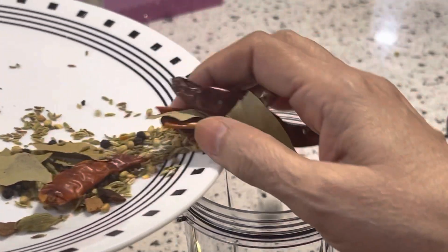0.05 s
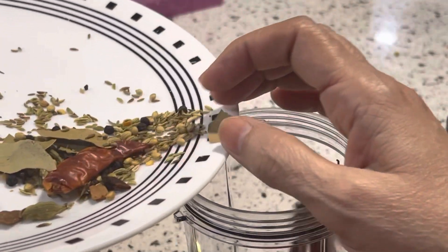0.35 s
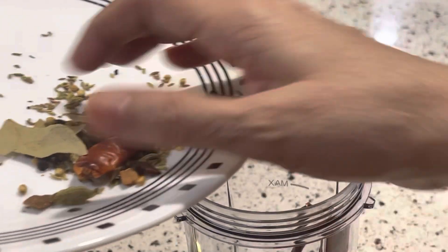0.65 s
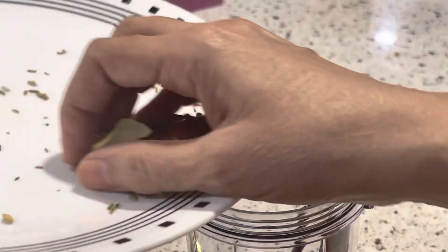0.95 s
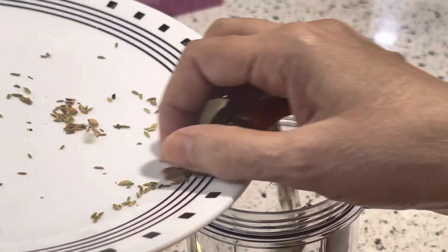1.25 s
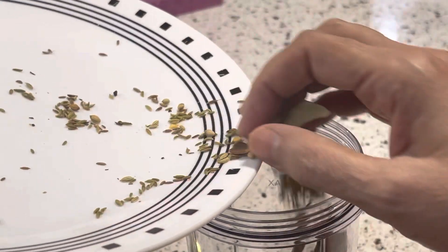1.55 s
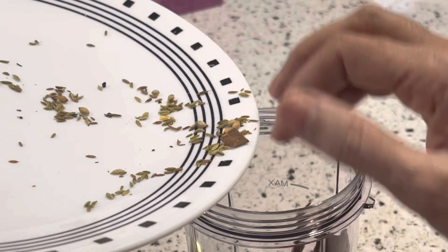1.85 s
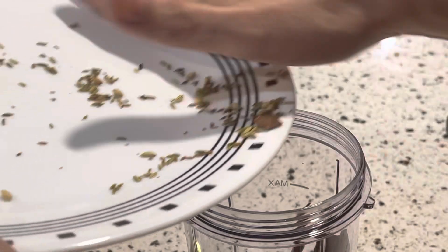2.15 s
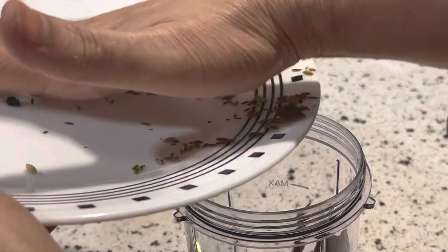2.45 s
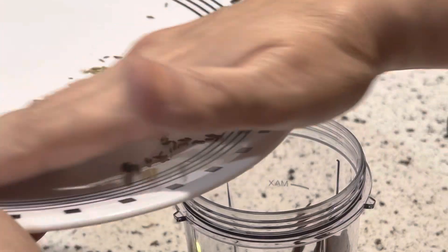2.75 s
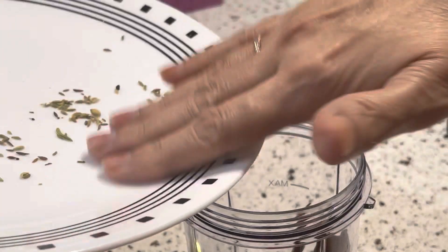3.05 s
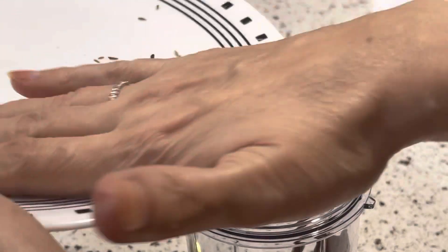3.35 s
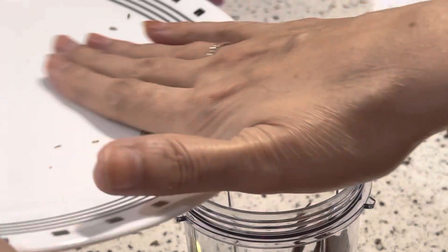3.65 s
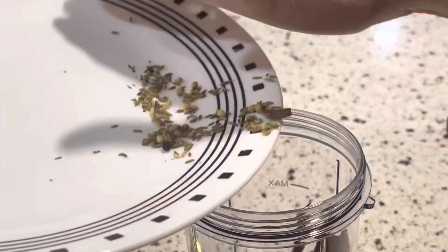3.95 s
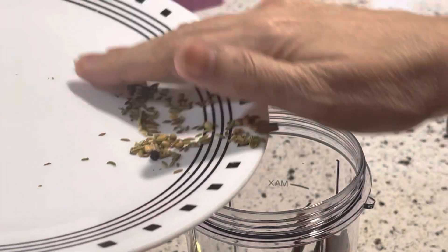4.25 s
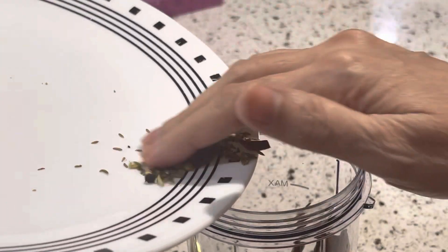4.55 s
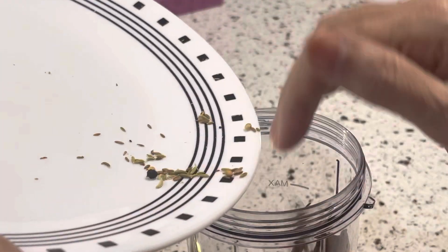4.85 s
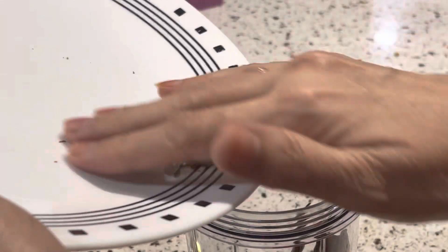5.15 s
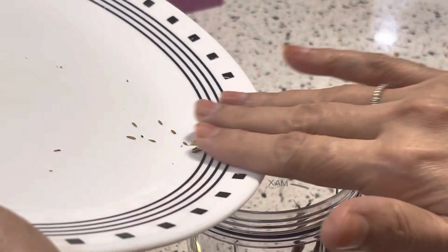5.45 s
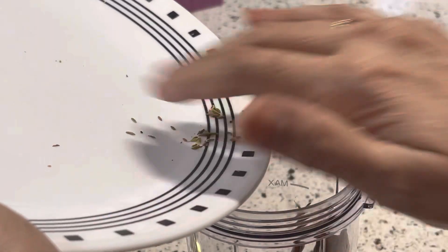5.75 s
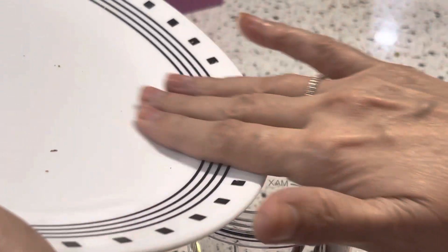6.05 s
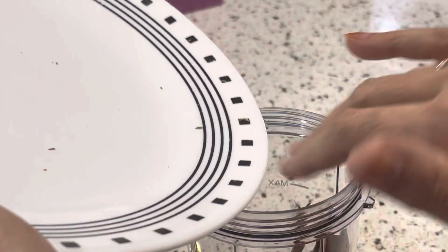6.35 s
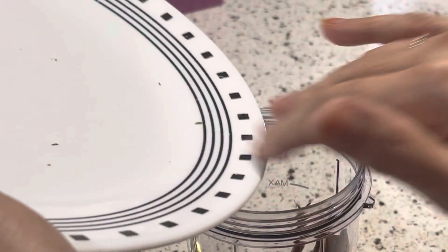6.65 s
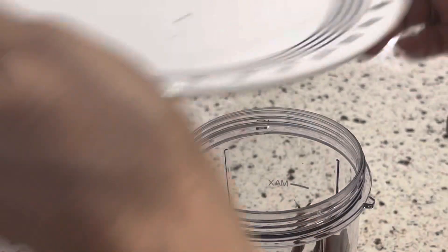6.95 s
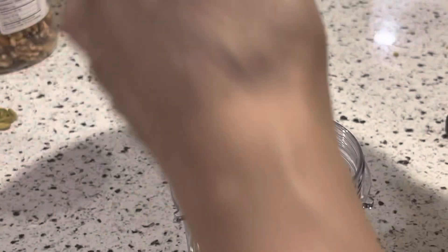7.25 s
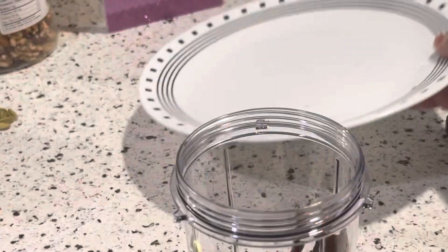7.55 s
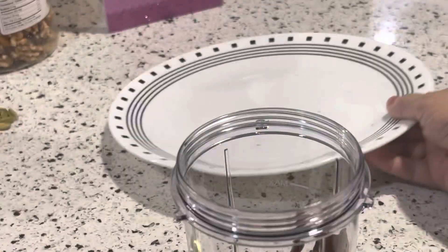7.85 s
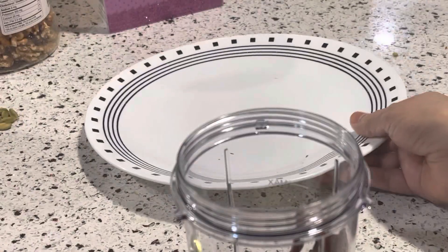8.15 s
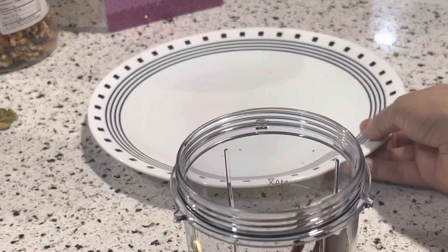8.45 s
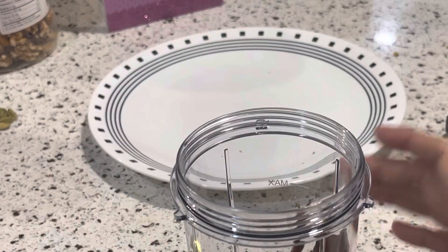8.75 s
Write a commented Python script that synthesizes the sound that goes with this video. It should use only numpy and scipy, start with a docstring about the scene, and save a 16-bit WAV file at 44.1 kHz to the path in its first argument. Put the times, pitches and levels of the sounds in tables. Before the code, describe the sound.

Seeds rattle into a plastic jar as a hand rubs a ringing ceramic plate, which then clunks onto a stone counter.

```python
"""In a kitchen, close by, dry whole spices are pinched and swept off a ceramic plate into a plastic jar. The
seeds patter as many small impacts and excite the resonances of the hollow jar. Friction of a palm on the glaze
makes a hiss and sets the plate singing; knocks of the plate on the jar's rim ring the plate's damped modes. At
the end clothing brushes, the empty plate is set on the stone counter, and the room reverberates."""
import sys
import numpy as np
from scipy import signal
from scipy.fft import rfft, irfft, next_fast_len
from scipy.io import wavfile
from scipy.ndimage import map_coordinates

SR = 44100
rng = np.random.default_rng(int(sys.argv[2]) if len(sys.argv) > 2 else 0)


def wrap_up_sound(samples):
    """Save the sound to the file named by the first command line argument, as 16-bit audio."""
    columns = np.atleast_2d(samples).T
    # keep every value between -1 and 1, then stretch to whole-number steps
    tamed = np.clip(columns, -1, 1)
    steps = np.round(tamed * 32767).astype(np.int16)
    wavfile.write(sys.argv[1], SR, steps)


N = 396459

# Levels in the tables are relative: each source applies its own gains and filters.
# handfuls sliding off the plate: (start [s], length [s], level [dB], dull share [dB], ping share [dB])
HANDFULS = [(0.0, .07, -47.5, 8, -7), (0.06, .22, -48, 7, -6), (0.24, .28, -44, 6, -4),
            (0.8, .36, -46.5, 4, -6), (1.02, .36, -52, 4, -7), (1.27, .64, -37.5, 4.5, -3),
            (1.78, .28, -56, -1, -4), (4.795, .27, -40, -4, -8), (5.625, .12, -48, 4, -10),
            (5.74, .2, -62, -5, -8), (6.388, .13, -51.5, -8, -10)]
# large pods, leaves and seeds that snap or land: (time [s], level [dB], dull share [dB])
PIECES = [(0.0744, -28, -4), (0.1171, -29, -18), (0.1353, -16, -11.5), (0.1834, -28, -1), (0.19, -27, -6.5),
          (0.2339, -11.5, -17.5), (0.242, -18, -18.5), (0.2488, -15, -22), (0.2535, -12.5, -18),
          (0.2749, -17, -6), (0.2803, -14, -10), (0.285, -10.5, -5), (0.3011, -19, -9), (0.3524, -15, -7),
          (0.3562, -13, -5), (0.3648, -18, -10), (0.3738, -16, -4), (0.3775, -9, -7), (0.3854, -14.5, -9),
          (0.796, -35, -8), (0.8022, -31, -3), (0.8145, -24, -5), (0.8185, -21, -7), (0.8857, -25, -9),
          (0.9235, -24, -6), (0.9679, -24, -11), (0.9936, -22.5, -17), (1.032, -20, -9.5),
          (1.1984, -31, -13.5), (1.2713, -32, -18), (1.296, -35, 2), (1.3102, -31, 0), (1.3409, -17.5, -12),
          (1.3611, -22, -9), (1.3819, -20, 2), (1.4144, -22, -14), (1.4344, -18, -12), (1.4639, -21, -10),
          (1.4803, -17, -9), (1.4915, -19, -14), (1.5048, -15, -16), (1.5547, -16, -17), (1.5615, -17, -13),
          (1.5714, -20, -14), (1.589, -20, -10), (1.6284, -24, -10), (1.6495, -24, -8), (1.6594, -22, -2),
          (1.6844, -25, -6), (1.7123, -20, -8), (1.7205, -21, -7), (1.7294, -25, -7), (1.7655, -22, -3),
          (1.768, -19, -6), (1.7931, -30, -16), (1.8285, -30, -10), (1.8464, -30, -13), (1.8901, -32, -6.5),
          (1.9074, -35, -13), (1.9669, -23.5, -24), (3.9244, -51, -15), (3.9609, -45, -26),
          (4.7314, -35, -24), (4.7378, -30, -22), (4.7463, -27, -26), (4.7627, -24, -0.5),
          (4.7967, -33, -10), (4.8334, -30, -6), (4.856, -26, -13), (4.8814, -26, -24), (4.8939, -20, -22),
          (4.9299, -24, -16), (5.0027, -28, -18), (5.429, -29.5, -5.5), (5.5313, -33.5, -8.5),
          (5.56, -34.5, -15), (5.638, -31, -18.5), (5.6534, -33, -3), (5.7279, -41, -5), (5.7725, -30, -25),
          (5.7936, -23.5, -28), (5.8014, -36, -10), (5.8825, -40, -14), (6.4113, -35, -18),
          (6.436, -35, -16), (6.755, -49, -20), (6.7785, -38, -30), (6.791, -43, -26), (6.803, -49, -24)]
# spectra of the bright and the dull part of the spices: (frequency [Hz], level [dB])
BRIGHT_SPECTRUM = [(40, -48), (260, -45), (700, -28), (1300, -25), (2200, -20), (4000, -10), (6500, -3.5),
                   (8300, -1), (9200, -4.5), (10400, -19), (11400, -11.5), (13500, -26), (15700, -28)]
DULL_SPECTRUM = [(60, -22), (300, -22.5), (700, -5.5), (1000, -17.5), (1300, 6), (1600, -1.5), (3000, 2),
                 (6000, -1.5), (9000, -6.5), (10500, -29), (16000, -46)]
# resonances of the glaze under sliding seeds: (frequency [Hz], bandwidth [Hz], level [dB])
SLIDING_MODES = [(4650, 300, -2), (8400, 450, 0)]
# clumps of seeds reaching the bottom of the jar: (time [s], level [dB])
LANDINGS = [(0.0, -54), (0.075, -57), (0.135, -50), (0.185, -53), (0.268, -43), (0.318, -47), (0.36, -39),
            (0.385, -38), (0.47, -53), (1.47, -54), (1.56, -45), (1.61, -48), (1.66, -50), (1.72, -48),
            (4.763, -49), (4.86, -58), (6.43, -64)]
# modes of the jar's air and walls: (frequency [Hz], t60 [s], level [dB])
JAR_MODES = [(172, .25, -21), (518, .18, 1), (1300, .07, -6)]
# moves of the arms and the held plate: (start [s], length [s], level [dB])
MOVES = [(0.0, .14, -57), (0.12, .36, -63), (0.48, .42, -75), (0.8, .07, -62), (1.09, .07, -59),
         (1.38, .2, -68), (1.58, .6, -76), (2.3, 1.02, -72), (3.41, .44, -70), (4.55, .7, -82),
         (5.42, .65, -65), (6.33, .37, -66), (6.98, .27, -77), (7.28, .3, -75), (7.5, .3, -73),
         (8.0, .5, -63), (8.48, .2, -61), (8.68, .31, -67)]
# spectra of the handling rustle and of the room's hush: (frequency [Hz], level [dB])
HANDLING_SPECTRUM = [(20, -28.5), (50, -4), (130, -3.5), (350, -2.5), (600, -14), (2000, -16), (3200, -25),
                     (9000, -32), (11000, -61)]
HUSH_SPECTRUM = [(20, -20), (60, 6), (250, -3), (700, -14), (1200, -17.5), (3500, -10.5), (6000, -9.5),
                 (8500, -3.5), (9400, -6.5), (10200, -35), (16000, -42)]
# blows on the plate: (time [s], level over the first 10 ms [dB], contact [name], high-pass [Hz],
# low-pass [Hz], ring length [ratio], crack rise [s])
BLOWS = [(0.8178, -30, "touch", 1000, 3600, .65, .0006), (2.1905, -18.3, "tap", 330, 12040, .9, .0012),
         (2.3692, -24, "clink", 600, 15060, .35, .0005), (2.3955, -31.5, "tap", 1800, 7000, .6, .0005),
         (2.410, -32, "tap", 2400, 11000, .55, .0004), (2.422, -37, "tap", 1800, 12000, .5, .0004),
         (2.449, -31, "clink", 1500, 6000, 1.1, .002), (2.4615, -18, "clink", 600, 8000, .8, .004),
         (2.471, -29, "clink", 400, 9000, .8, .001), (2.519, -31, "clink", 1000, 3500, 1.3, .002),
         (4.543, -42, "touch", 330, 1500, 1, .0006), (5.3255, -26.3, "pat", 180, 5600, 1, .0009),
         (6.0813, -34.3, "pat", 185, 4800, 1, .0009), (7.032, -55, "graze", 600, 11000, 1, .0006),
         (7.040, -59, "graze", 600, 14200, 1, .0006), (7.135, -64, "graze", 900, 5000, 1, .002),
         (7.717, -66, "touch", 550, 2600, 1.5, .002), (7.8538, -11, "set", 230, 10000, 1, .0015),
         (7.871, -31, "set", 900, 9000, .6, .001), (8.0808, -37, "graze", 4300, 14000, .45, .0004),
         (8.5206, -52.5, "graze", 1800, 12000, .5, .0004)]
# six contacts: edge tap on the jar, rim clink, pat of the hand, foot set on the counter, fingertip
# touch, light graze; name: (crack decay [s], crack level [dB], thud level [dB], room share [dB])
CONTACTS = {"tap": (.003, 2.5, -32, -11.5), "clink": (.003, 1, -31, -10), "pat": (.006, .5, -12.5, -8.5),
            "set": (.0025, -5.5, -26, -9.5), "touch": (.005, -5, -13, -11), "graze": (.004, -2, -30, -7)}
# modes of the plate on jar or counter: (frequency [Hz], t60 [s], level at each of the six contacts [dB])
PLATE_MODES = [(171, .28, -44.5, -48, -18.5, -16, -30, -40), (415, .08, -41, -42, -6, -19, -16, -35),
               (510, .12, -27, -36, -3.5, -30, -1, -35), (560, .052, -11, -41.5, -6, -30, -14, -35),
               (765, .075, -20.5, -8, -3, -.5, -16, -20), (773, .9, -27, -31, -33, -28, -34, -32),
               (783, .12, -7, -18, -2, -17, 0, -5), (960, .04, -36, -11, -15, -16, -16, -25),
               (1430, .09, -16, -12, -22, -20, -8, -9), (1570, .08, -19.5, -11, -34.5, -24, -25, -25),
               (1700, .054, -19.5, -12, -32, -13, -28, -20), (2105, .06, 2, -15.5, -9, -27.5, -28, -15),
               (2320, .08, -12.5, -1, -21, -14.5, -14, -18), (2780, .06, -3, -5, -17, -33, -32, -18),
               (2920, .05, -9, -3, -28, -45, -40, -25), (3230, .04, -8, -2, -37.5, -39.5, -40, -28),
               (3410, .06, -11, 0, -14, -29, -35, -12), (4085, .055, -5, -22, -17, -21, -35, -22),
               (4390, .1, -9, -5, -17, -16, -22, -3), (4530, .08, -7, -4, -26, -26, -24, -7),
               (4885, .06, -8, -19.5, -25, -39.5, -24, -9), (5590, .06, -9, 1, -17, -33, -14, -3),
               (5760, .06, -3, -9, -24, -32, -17, -3), (6350, .056, -16, -20, -24, -19.5, -24, -4),
               (6820, .06, -4, -14, -18, -33, -18, -4), (7050, .06, -2, -2, -19, -35, -16, 2),
               (7850, .05, -4, -15, -21, -22, -20, -5), (8380, .06, -5, 0, -17, -21, -13, -5)]
# the crack, from many brief modes: (frequency [Hz], level at each of the six contacts [dB])
CRACK_SPECTRA = [(40, -42, -38, -15.5, -25, -20, -30), (307, -25, -29, -8, -13, -8, -20),
                 (566, -16.5, -31, 5.5, -6.5, 3, -16), (960, -19, -9, -5, -10, 2, -16),
                 (1280, -4, -16, -5, -5, -1, -13), (2300, -3.5, -.5, -12, -4.5, -10, -11),
                 (2700, -.5, 1, -12, -15, -15, -12.5), (3050, 1.5, 2, -13, -28, -20, -14),
                 (3400, -3, -2, -12.5, -12, -20, -13.5), (3900, -8, -7, -12, -11, -20, -13),
                 (5000, -3, -12, -8, -22, -10, -4), (5800, 0, -7, -7, -16, -9, -2),
                 (8840, -4.5, 1, 2, -19.5, -6, -1), (9300, -10.5, -7, -9, -15.5, -12, 0),
                 (10600, -41.5, -27, -40, -38.5, -40, -22), (16500, -56.5, -61, -54.5, -69.5, -65, -45)]
# thud of a blow passing into the counter: (frequency [Hz], level [dB])
THUD_SPECTRUM = [(25, -30), (50, -5), (80, -7.5), (100, -10.5), (117, -4), (135, -8.5), (168, 5.5),
                 (205, -8.5), (270, -7.5), (320, -15.5), (420, -12), (900, -43), (3000, -81)]
# strokes of the hand over the glaze: (start [s], length [s], hiss level [dB], singing level [dB])
STROKES = [(1.24, .42, -52, -55), (2.58, .62, -58, -77), (3.43, .42, -55, -65), (3.995, .18, -60, -95),
           (4.13, .22, -61, -79), (4.3, .24, -59, -72), (4.54, .24, -58, -74), (5.06, .26, -62, -76),
           (5.44, .17, -60, -77), (5.89, .2, -59.5, -66), (6.11, .27, -55, -76), (6.6, .11, -56, -85),
           (7.02, .16, -74, -77), (7.78, .07, -68, -86), (8.25, .3, -66, -90), (8.5, .24, -65, -74),
           (8.74, .08, -69, -95), (8.85, .07, -60, -100), (8.93, .06, -68, -95)]
# spectrum of the friction hiss: (frequency [Hz], level [dB])
FRICTION_SPECTRUM = [(100, -41), (700, -26.5), (1500, -29.5), (3000, -21.5), (4500, -14), (7000, -6),
                     (8500, 2), (9400, -2.5), (10100, -26), (12000, -32), (16000, -45.5)]
# resonances of the plate under the hand: (frequency [Hz], bandwidth [Hz], level [dB])
SINGING_MODES = [(785, 35, 12), (1420, 55, 13), (2300, 74, 17), (3420, 80, 5), (4720, 110, 8),
                 (5560, 180, 2), (6150, 110, 4), (6850, 90, 1), (7100, 130, -1), (7700, 130, 0),
                 (8240, 60, -2), (8470, 160, -1)]
# brushes of clothing as the plate is carried away: (start [s], length [s], level [dB])
BRUSHES = [(7.28, .22, -68.5), (7.48, .22, -75), (7.72, .13, -74)]
# spectrum of brushing cloth: (frequency [Hz], level [dB])
CLOTH_SPECTRUM = [(100, -8), (500, 2), (1000, -1), (2300, -1), (3300, -9), (5000, -6), (7000, -5),
                  (8800, -2), (10200, -22), (12000, -18), (16000, -40)]
# reverberation of the kitchen: (frequency [Hz], t60 [s], level [dB])
ROOM_BANDS = [(100, .5, 0.5), (250, 0.22, 3.5), (770, 1.125, 0.5), (2050, 0.98, 1), (5000, 0.94, -0.5),
              (8500, .85, -1), (12000, 0.92, 0), (16000, 0.31, -14.5)]


def amp(db):
    """Amplitude ratio of a level in decibels."""
    return 10 ** (np.asarray(db) / 20)


def unit(x):
    """Normalisation to energy 1."""
    return x / np.sqrt(np.sum(x ** 2) + 1e-20)


def read(points, hz, column=1):
    """Linear interpolation of a table column over log frequency."""
    points = np.array(points)
    return np.interp(np.log(hz + 1), np.log(points[:, 0] + 1), points[:, column])


def add(mix, start_s, sound):
    """Superposition: a sound joins the mix at its start time."""
    part = mix[max(round(start_s * SR), 0):][:len(sound)]
    part += sound[:len(part)]


def colour(x, spectrum, column=1, size=4096):
    """Spectral shaping by a causal filter of energy 1."""
    log_gain = np.log(amp(read(spectrum, abs(np.fft.fftfreq(size, 1 / SR)), column)))
    taps = np.fft.ifft(np.exp(np.conj(signal.hilbert(log_gain)))).real[:size // 2]
    return signal.oaconvolve(x, unit(taps))[:len(x)]


def resonate(x, modes):
    """Forced response of resonators in parallel."""
    return sum(amp(db) * signal.lfilter(*signal.iirpeak(hz, hz / width, SR), x)
               for hz, width, db in modes)


def sweeps(rows, skew, sharpness, column=2):
    """Amplitude envelope: each movement is an arch that, with skew below 1, rises sooner than it falls."""
    gain = np.zeros(N)
    for row in rows:
        progress = np.linspace(0, 1, round(row[1] * SR))
        add(gain, row[0], amp(row[column]) * abs(np.sin(np.pi * progress ** skew)) ** sharpness)
    return gain


def wander(per_s):
    """Slow random modulation around zero."""
    return np.interp(np.arange(N) / SR * per_s, np.arange(2048), rng.standard_normal(2048))


def grains(per_s, spread_db, decay_s, shapes=24, size=192):
    """Shot noise: tiny impacts at random moments, a few of them large; rms 1."""
    onsets = np.flatnonzero(rng.random(N) < per_s / SR)
    strength = amp(spread_db * np.minimum(rng.exponential(1, N)[onsets], 4))
    shape = rng.integers(0, shapes, N)[onsets]
    ticks = rng.standard_normal((size, shapes)) * np.exp(-np.arange(size) / SR / decay_s)[:, None]
    out = np.zeros(N + size)
    for lag, values in enumerate(ticks / np.linalg.norm(ticks, axis=0)):
        out[onsets + lag] += strength * values[shape]
    return unit(out[:N]) * np.sqrt(N)


def seed_pings(per_s=550, spread_db=2.7, decay_cycles=4.5, range_hz=(2800, 9600)):
    """Damped oscillation: seeds of all sizes strike at random, each ringing at its own pitch; rms 1."""
    out, t = np.zeros(N), np.arange(400) / SR
    chance, pitch, size = rng.random((3, N))
    for i in np.flatnonzero(chance < per_s / SR):
        hz = np.interp(pitch[i], [0, 1], range_hz)
        db = spread_db * min(-np.log(1 - size[i]), 4)
        ping = np.sin(2 * np.pi * hz * t) * np.exp(-hz * t / decay_cycles)
        add(out, i / SR, amp(db) * unit(ping))
    return unit(out) * np.sqrt(N)


def sliding_seeds(skew=.68, sharpness=1.7):
    """Dense impacts merge into noise as each handful swells and trickles out: (bright, dull)."""
    dust = grains(per_s=1900, spread_db=2.9, decay_s=.0005)
    dust = amp(-1.7) * (dust + amp(-6) * resonate(dust, SLIDING_MODES))
    coarse = amp(-18) * dust + amp(-15) * grains(per_s=220, spread_db=3, decay_s=.0008)
    dull_rows = [(start, length, db + dull_db) for start, length, db, dull_db, _ in HANDFULS]
    ping_rows = [(start, length, db + ping_db) for start, length, db, _, ping_db in HANDFULS]
    bright = dust * sweeps(HANDFULS, skew, sharpness) + seed_pings() * sweeps(ping_rows, skew, sharpness)
    return bright, coarse * sweeps(dull_rows, skew, sharpness)


def large_pieces(rise_s=.0005, decay_s=.0015, ring_hz=7100, top_hz=8600, hz_per_db=110, width_hz=900):
    """A pulse excites each piece's resonance; larger, duller pieces ring lower: (bright, dull)."""
    bright, dull, t = np.zeros(N), np.zeros(N), np.arange(2048) / SR
    pulse = np.exp(-t / decay_s) * (1 - np.exp(-t / rise_s))
    for start, db, dull_db in PIECES:
        tick = rng.choice([-1, 1]) * amp(db - 9.5) * pulse / pulse.max()
        tick = tick * rng.choice([-1, 1], len(t))  # random signs turn the pulse into a noise burst
        hz = min(ring_hz - hz_per_db * dull_db, top_hz) * (1 + .09 * rng.uniform(-1, 1))
        add(bright, start, tick + resonate(tick, [(hz, width_hz, 2)]))
        add(dull, start, tick * amp(dull_db))
    return bright, dull


def spices():
    """Source and filter: impacts of seeds and large pieces share a bright and a dull spectrum."""
    seeds_bright, seeds_dull = sliding_seeds()
    pieces_bright, pieces_dull = large_pieces()
    bright = colour(seeds_bright + pieces_bright, BRIGHT_SPECTRUM)
    return bright + colour(seeds_dull + pieces_dull, DULL_SPECTRUM)


def jar(note_db=3.3, patter_db=-10, detune=.011, rise_s=.005, settle_s=.04):
    """Cavity and wall resonance: each clump strikes a hollow note, and patters as it settles."""
    notes, settling, t = np.zeros(N), np.zeros(N), np.arange(SR // 2) / SR
    hz, t60, mode_db = np.transpose(JAR_MODES)[:, :, None]
    for start, db in LANDINGS:
        onset = amp(db) * (1 - np.exp(-t / rise_s))
        swing = np.sin(2 * np.pi * hz * (1 + detune * rng.standard_normal(hz.shape)) * t)
        add(notes, start, onset * (amp(mode_db - 60 * t / t60) * swing).sum(0))
        add(settling, start, onset * np.exp(-t / settle_s))
    impacts = grains(per_s=350, spread_db=2.0, decay_s=.00026)
    patter = resonate(impacts, [(560, 200, 0), (1300, 160, 0)])
    return amp(note_db) * notes + amp(patter_db) * settling * patter / np.std(patter)


def handling(level_db=-2):
    """Amplitude-modulated noise: a low rustle follows each move of the arms and the held plate."""
    rustle = colour(rng.standard_normal(N), HANDLING_SPECTRUM)
    return amp(level_db) * sweeps(MOVES, skew=.8, sharpness=.6) * rustle


def room_hush(level_db=-81.5):
    """Stationary noise: the faint, steady hush of the room."""
    return amp(level_db) * colour(rng.standard_normal(N), HUSH_SPECTRUM)


def plate_ring(t, contact, length, rise_s=.002, detune=.003, split=.015, twin_db=-7, twins_above_hz=900):
    """Free vibration: the point of contact sets how strongly each of the plate's damped modes rings."""
    hz, t60, *contact_db = np.transpose(PLATE_MODES)[:, :, None]
    held_hz = hz * (1 + detune * rng.standard_normal(hz.shape))  # the grip shifts the modes a little
    twin_hz = held_hz * (1 + split * rng.choice([-1, 1], hz.shape))  # a round plate's high modes pair up
    twins = np.sin(2 * np.pi * (twin_hz * t + rng.random(hz.shape)))
    swing = np.sin(2 * np.pi * held_hz * t) + amp(twin_db) * (hz > twins_above_hz) * twins
    fade = np.exp(-np.log(1000) * t / (t60 * length))
    onset = (1 - np.exp(-t / (rise_s * length))) ** 2
    return unit((amp(contact_db[contact]) * fade * swing).sum(0) * onset)


def noise_burst(t, rise_s, decay_s):
    """A transient: white noise with exponential rise and decay."""
    return rng.standard_normal(len(t)) * np.exp(-t / decay_s) * (1 - np.exp(-t / rise_s))


def plate_blows(thud_ref_hz=200, thud_db_per_octave=13, top_hz=9600):
    """Impact excitation: each blow gives a ring, a crack and a thud: (direct, sent to the room)."""
    direct, to_room, t = np.zeros(N), np.zeros(N), np.arange(SR // 3) / SR
    for start, db, kind, low_hz, soft_hz, length, crack_rise_s in BLOWS:
        contact = list(CONTACTS).index(kind)
        crack_decay_s, crack_db, thud_db, room_db = CONTACTS[kind]
        ring = plate_ring(t, contact, length)
        crack = colour(noise_burst(t, crack_rise_s, crack_decay_s * length), CRACK_SPECTRA, contact + 1)
        blow = ring + amp(crack_db) * unit(crack)
        # soft contacts stir little treble; light ones little bass and a weaker thud
        blow = signal.lfilter(*signal.butter(1, soft_hz, fs=SR), blow)
        blow = signal.sosfilt(signal.butter(3, low_hz, "high", fs=SR, output="sos"), blow)
        thud_db -= thud_db_per_octave * np.log2(low_hz / thud_ref_hz)
        thud = colour(noise_burst(t, rise_s=.013, decay_s=.03), THUD_SPECTRUM)
        blow = unit(blow) + amp(thud_db) * unit(thud)
        blow *= amp(db) / np.std(blow[:SR // 100])
        add(direct, start, blow)
        add(to_room, start, blow * amp(room_db))
    # a steep low-pass takes the top treble off the blows
    return signal.sosfilt(signal.butter(7, top_hz, fs=SR, output="sos"), [direct, to_room])


def rubbing(hiss_db=-2, singing_db=-2.5, slip_db=1.3, drift=.005):
    """Friction: skin and dust slip on the glaze and drive the plate's modes, unevenly as the hand grips."""
    hiss = colour(grains(per_s=5500, spread_db=2.8, decay_s=.00034), FRICTION_SPECTRUM)
    speed = sweeps(STROKES, skew=.85, sharpness=1.2)
    grip = sweeps(STROKES, skew=.9, sharpness=1.1, column=3) * amp(slip_db * wander(per_s=45))
    singing = resonate(hiss * grip, SINGING_MODES) / np.std(resonate(hiss, SINGING_MODES[2:3]))
    # the moving hand bends the pitches
    shift_samples = signal.lfilter([1], [1, -np.exp(-10 / SR)], drift * wander(per_s=14))
    singing = map_coordinates(singing, [np.arange(N) + shift_samples], order=3)
    return amp(hiss_db) * hiss * speed + amp(singing_db) * singing


def clothing():
    """Friction noise: cloth brushes in many tiny slips as the arms carry the plate away."""
    slips = grains(per_s=4000, spread_db=2.2, decay_s=.0006)
    return sweeps(BRUSHES, skew=.9, sharpness=.8) * colour(slips, CLOTH_SPECTRUM)


def reverberation(x, width=.92, build_s=.0027):
    """A diffuse field off hard walls: each band decays at its own rate; the bass is alike on both sides."""
    hz, t, (mid, side) = signal.stft(rng.standard_normal((2, SR * 3 // 2)), SR, nperseg=256)
    side = side * (width * hz / (hz + 150))[:, None]
    t60, band_db = read(ROOM_BANDS, hz)[:, None], read(ROOM_BANDS, hz, column=2)[:, None]
    fade = np.exp(-np.log(1000) * t / t60) * amp(band_db)
    tail = signal.istft(np.array([mid + side, mid - side]) * fade, SR, nperseg=256)[1]
    tail *= 1 - np.exp(-np.arange(tail.shape[1]) / SR / build_s)
    return signal.fftconvolve(x[None], unit(tail) * np.sqrt(2), axes=1)[:, :N]


def scene():
    """Direct plus reverberant sound: all sources are close in front, each with its share of the room."""
    seeds, hollow = spices(), jar()
    blows, blows_to_room = plate_blows()
    rub = rubbing()
    background = room_hush() + handling() + clothing()
    to_room = amp(-8) * seeds + amp(-12) * hollow + blows_to_room + amp(-9) * rub + amp(-6) * background
    return seeds + hollow + blows + rub + background + reverberation(to_room)


def record(dry, left_lag_s=.00002, edge_hz=15900):
    """Arrival-time difference: sound reaches the left side slightly later; a low-pass limits the band."""
    size = next_fast_len(N + 512)
    delay = np.exp(-2j * np.pi * np.fft.rfftfreq(size, 1 / SR) * left_lag_s)
    left = irfft(rfft(dry[0], size) * delay, size)[:N]
    low_pass = signal.firwin(511, edge_hz, window=("kaiser", 9), fs=SR)
    return signal.oaconvolve(np.array([left, dry[1]]), low_pass[None], "same", axes=1)


dry = scene()
out = record(dry)
wrap_up_sound(out)
```